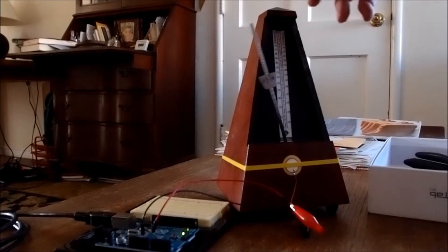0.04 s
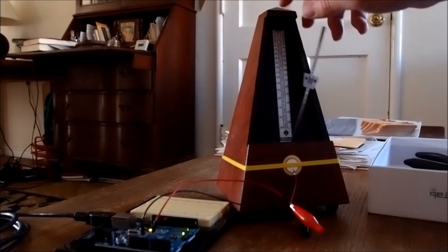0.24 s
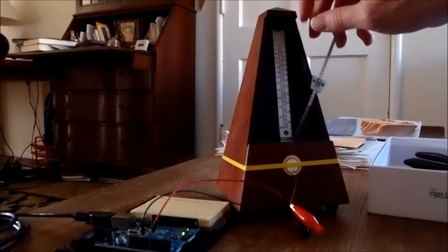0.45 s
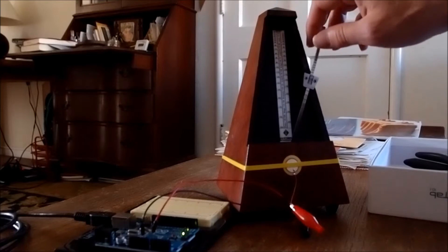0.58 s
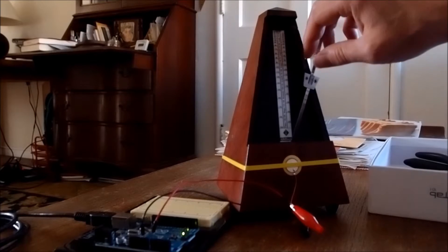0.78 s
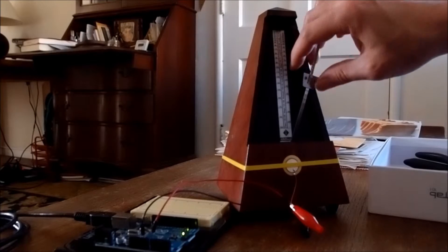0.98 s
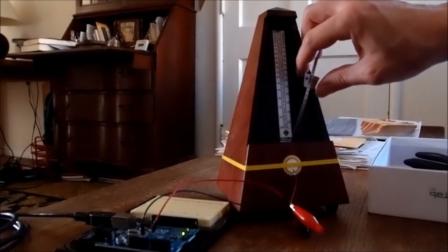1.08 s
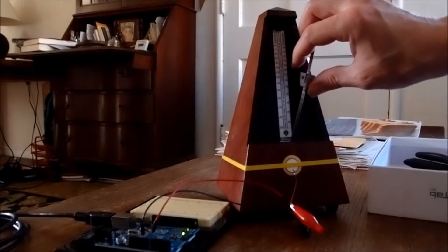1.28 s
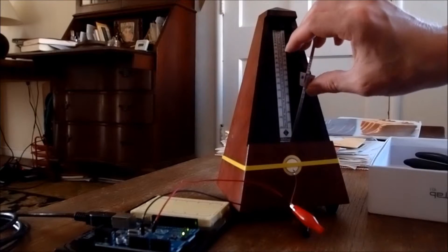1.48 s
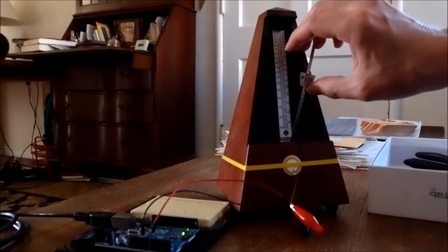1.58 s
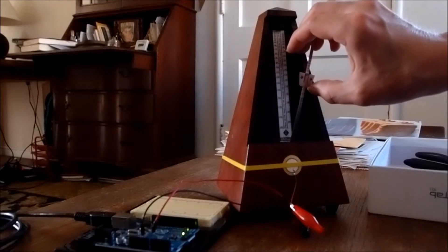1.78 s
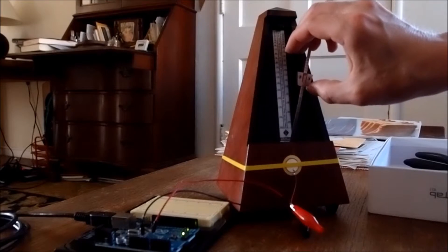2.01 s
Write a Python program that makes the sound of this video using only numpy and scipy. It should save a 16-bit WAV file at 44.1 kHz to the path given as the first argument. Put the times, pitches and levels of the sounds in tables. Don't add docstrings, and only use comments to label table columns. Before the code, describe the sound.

One loud, woody metronome tick in a quiet room, followed by soft metallic taps and light rubbing

```python
import sys
import numpy as np
from scipy import signal
from scipy.fft import rfft, irfft
from scipy.io import wavfile
from scipy.ndimage import uniform_filter1d

SR = 44100
rng = np.random.default_rng(int(sys.argv[2]) if len(sys.argv) > 2 else 0)


def to_wav(sig):
    pcm = np.clip(np.atleast_2d(sig), -1, 1) * 32767
    pcm = np.round(pcm).astype(np.int16)
    wavfile.write(sys.argv[1], SR, pcm.T)


def gain_from_decibels(decibels):
    exponent = np.asarray(decibels, float) / 20
    return 10 ** exponent


N = 90404

# frequency [Hz], density [dB per Hz].
FLOOR = [(30, -19), (100, -7), (300, 4.5), (700, -6.5), (2000, -14.5), (8000, -23), (11500, -30.5),
         (14500, -26)]
FLOOR_DB, FLICKER_DB = -52, -1.25
# frequency [Hz], width [Hz], level [dB].
FAN = [(81.4, 8, -69), (202.4, 15.3, -63.5), (287, 5.2, -72), (340, 6.1, -83), (1708, 13, -74.5)]
# frequency [Hz], level [dB], wobble [dB].
TONES = [
    (469, -53, 2),
    (15482, -70.5, 1.5),
]
MAINS_HZ, MAINS_DB = 120, -62
BEAT_HZ, BEAT_DB, BEAT_PEAK_S = 1.05, 6, 0.15

# delay [s], level [dB].
ECHOES = [(.0062, -17), (.0125, -20), (.0158, -13), (.027, -19), (.042, -20)]
# frequency [Hz], level [dB], decay time t60 [s].
ROOM = [(245, -28.5, 0.42), (487, -36.5, 0.49), (1080, -42.5, 0.54), (2000, -34, 0.47), (3700, -38.5, 0.51),
        (7000, -36.5, 0.51), (10200, -34, 0.35), (15400, -20, 0.12)]
ROOM_RISE_S = 0.0013

# start [s], level [dB], decay time t60 [s], lowest frequency [Hz].
SNAPS = [
    (.159, -52, .006, 8000),
    (0.597, -34.5, 0.0079, 1490),
    (.898, -52, 0.0095, 1490),
]
SNAP_TOP_HZ = 8900

# start [s], level [dB].
BLOWS = [
    (.24595, -2),
    (.2471, -12),
    (.2487, -12),
    (.2499, -17),
]
# frequency [Hz], level [dB], decay time t60 [s].
CASE = [(560, -22.5, 0.022), (737, -16.5, 0.054), (1084, -7, 0.0097), (1400, -36, 0.0044),
        (1770, -12.5, 0.013), (2380, -16, 0.0062), (2700, -6, 0.0087), (3290, -15.5, 0.009),
        (4200, -10, 0.023), (4730, -14, 0.0093), (5540, -12.5, 0.0079), (6510, -12, 0.0083),
        (8530, -17, 0.016), (10340, -18, 0.0043)]
# frequency [Hz], level [dB], decay time t60 [s].
STEEL_EDGE = (13700, -7, 0.0013)
# frequency [Hz], level [dB], decay time t60 [s].
DESK = [(209, -43.5, 0.17), (282.3, -32.5, 0.27), (478.5, -41, 0.34)]
# frequency [Hz], level [dB], t60 [s].
BACK = [(1100, -10, 0.023), (2104, -22, .03), (3566, -16, 0.034), (4697, -9, 0.025), (4860, -16, 0.032),
        (7030, -21.5, 0.014), (10800, -30, 0.0087)]
FRONT_HZ = 3000
FRONT_SPREAD_DB = -3
SPREAD_DB, SPREAD_S = 0.5, 0.003
BUILD_S, REBOUND_SCATTER_DB = 0.0002, 2
RATTLE_DB, RATTLE_T60_S = -16, 0.031
EARLIER_TICK_S, EARLIER_DB = 0.25, -1

# start [s], level [dB], rod pitch [Hz], decay time t60 [s], thud level [dB].
TOUCHES = [(0.608, -44, 7000, .008, -33.5), (0.62, -45, 2700, 0.011, -34), (.638, -57, 2000, 0.011, -49),
           (.598, -39, 3320, 0.012, -35), (.845, -46.5, 1830, .02, -68), (.898, -40, 3500, 0.0068, -60),
           (1.0934, -41, 2460, .012, -35), (1.1031, -39.5, 2660, 0.029, -48), (1.557, -42, 2580, .022, -63),
           (1.586, -58, 2500, 0.0099, -58)]
# pitch ratio, level [dB].
ROD = [(.75, -3), (1, 0), (1.24, -2)]
# start [s], level [dB], pitch [Hz], decay time t60 [s].
PINGS = [(1.092, -52, 10800, 0.0091), (1.0928, -43.5, 2680, 0.029), (1.109, -57, 3190, 0.017),
         (1.134, -51, 1890, 0.065), (1.558, -47.5, 6900, 0.017)]
CONTACT_S, TOUCH_NOISE_DB, TOUCH_WET_DB = 0.0012, -9, -2
THUD_HZ, THUD_T60_S = 272, 0.034
THUD_HIGH_HZ, THUD_HIGH_DB = 543, -5

# time [s], level [dB].
SLIDE = [(1.179, -80), (1.28, -64), (1.4, -65), (1.5, -66.5), (1.56, -89)]

# frequency [Hz], width [Hz], depth [dB].
GAPS = [(5260, 90, -18), (7730, 110, -16)]
# frequency [Hz], width [Hz], depth [dB].
DIPS = [(9500, 1070, -5.5), (12200, 440, -17)]
BASS_CUT_HZ, TOP_HZ = 180, 15790


def unit(x):
    return x / np.sqrt(np.mean(x ** 2))


def shaped(x, gain):
    return irfft(rfft(x) * gain(np.fft.rfftfreq(len(x), 1 / SR) + 1), len(x))


def band(hz, width_hz, size=N):
    noise = rng.standard_normal(size)
    return unit(shaped(noise, lambda f: 1 / (1 + (2 * (f - hz) / width_hz) ** 2)))


def fade(t, t60):
    return np.exp(-np.log(1000) * np.maximum(t, 0) / t60) * (t >= 0)


def ring(t, hz, t60):
    return fade(t, t60) * np.sin(2 * np.pi * min(hz, 0.45 * SR) * t)


def walk(rate):
    k = int(SR / rate)
    return unit(uniform_filter1d(uniform_filter1d(rng.standard_normal(N), k), k))


def background(t):
    floor_hz, floor_db = np.array(FLOOR).T
    floor = 0
    for centre in 30 * 2 ** np.arange(10):
        def gain(f):
            octave = np.cos(np.pi / 2 * np.clip(np.log2(f / centre), -1, 1))
            return gain_from_decibels(np.interp(np.log(f), np.log(floor_hz), floor_db)) * octave
        floor = floor + shaped(rng.standard_normal(N), gain) * gain_from_decibels(FLICKER_DB * walk(18))
    out = gain_from_decibels(FLOOR_DB) * unit(floor)
    out += sum(gain_from_decibels(db) * band(hz, width) for hz, width, db in FAN)
    for hz, db, wobble_db in TONES:
        level = gain_from_decibels(db + wobble_db * walk(13.3)) * np.sqrt(2)
        out += level * np.sin(2 * np.pi * hz * t + 0.5 * walk(5))
    beat_db = BEAT_DB * np.cos(2 * np.pi * BEAT_HZ * (t - BEAT_PEAK_S))
    return out + gain_from_decibels(MAINS_DB + beat_db) * np.sin(2 * np.pi * MAINS_HZ * t)


def room():
    t = np.arange(SR) / SR
    echoes = sum(gain_from_decibels(db) * np.maximum(1 - np.abs(t - s) * SR, 0) for s, db in ECHOES)
    tail = 0
    for hz, db, t60 in ROOM:
        tail = tail + gain_from_decibels(db) * np.sqrt(hz / SR) * band(hz, 0.51 * hz, size=SR) * fade(t, t60)
    return echoes, tail * (1 - np.exp(-(t / ROOM_RISE_S) ** 2))


def snaps(t):
    out = np.zeros(N)
    for s, db, t60, low_hz in SNAPS:
        def gain(f):
            return f ** 2 / (f ** 2 + low_hz ** 2) / np.hypot(1, f / SNAP_TOP_HZ)
        out += gain_from_decibels(db) * fade(t - s, t60) * shaped(rng.standard_normal(N), gain)
    return out


def tick(t):
    modes = [*CASE, STEEL_EDGE]
    scatter = rng.standard_normal((len(BLOWS), len(modes)))
    scatter[0] = 0
    start, start_db = BLOWS[0]
    out = sum(gain_from_decibels(db) * ring(t - start, hz, t60) for hz, db, t60 in DESK)
    for (s, blow_db), mix in zip(BLOWS, scatter):
        build = np.clip((t - s) / BUILD_S, 0, 1)
        for k, (hz, db, t60) in enumerate(modes):
            side = -1 if hz > FRONT_HZ else (-1) ** k
            if mix[k - 1] > 0:
                side = -side
            level = gain_from_decibels(blow_db + db + REBOUND_SCATTER_DB * mix[k])
            out = out + side * level * ring(t - s, hz, t60) * build
    out = out + gain_from_decibels(RATTLE_DB) * band(3100, 10500) * fade(t - start, RATTLE_T60_S)

    front = [(hz, db + FRONT_SPREAD_DB, t60) for hz, db, t60 in modes]
    power = sum(np.abs(rfft(gain_from_decibels(db) * ring(t, hz, t60))) ** 2 for hz, db, t60 in [*front, *DESK, *BACK])
    pulse = irfft(np.sqrt(power), N)
    spread = np.roll(pulse, int((start + SPREAD_S) * SR)) * gain_from_decibels(start_db + SPREAD_DB)
    return out, spread


def touches(t):
    out, noise = np.zeros(N), band(3000, 3000)
    for s, db, hz, t60, thud_db in TOUCHES:
        rod = sum(gain_from_decibels(part_db) * ring(t - s, hz * ratio, t60) for ratio, part_db in ROD)
        rod = rod + gain_from_decibels(TOUCH_NOISE_DB) * noise * fade(t - s, t60)
        thud = ring(t - s, THUD_HZ, THUD_T60_S)
        thud = thud + gain_from_decibels(THUD_HIGH_DB) * ring(t - s, THUD_HIGH_HZ, THUD_T60_S)
        out += (gain_from_decibels(db) * rod + gain_from_decibels(thud_db) * thud) * np.clip((t - s) / CONTACT_S, 0, 1)
    return out + sum(gain_from_decibels(db) * ring(t - s, hz, t60) for s, db, hz, t60 in PINGS)


def slide(t):
    s, db = np.array(SLIDE).T
    return gain_from_decibels(np.interp(t, s, db) + 1.1 * walk(72)) * band(5200, 5300)


def scene():
    t = np.arange(N) / SR
    bass_cut = signal.butter(3, BASS_CUT_HZ, "high", fs=SR, output="sos")
    beat, spread = signal.sosfilt(bass_cut, tick(t))
    hand = signal.sosfilt(bass_cut, touches(t) + snaps(t) + slide(t))
    echoes, tail = room()
    wet = signal.fftconvolve(beat, echoes) + signal.fftconvolve(spread, tail)
    skip = int((BLOWS[0][0] + EARLIER_TICK_S) * SR)
    earlier = gain_from_decibels(EARLIER_DB) * wet[skip:skip + N]
    hand_wet = gain_from_decibels(TOUCH_WET_DB) * signal.fftconvolve(hand, echoes + tail)[:N]
    return (beat + wet[:N] + earlier + hand + hand_wet + background(t))[None]


def low_pass(x):
    return signal.sosfilt(signal.butter(12, 16850, fs=SR, output="sos"), x)


def record(dry):
    x = dry[0]
    for hz, width, db in GAPS:
        x = x - (1 - gain_from_decibels(db)) * signal.lfilter(*signal.iirpeak(hz, hz / width, fs=SR), x)

    def gain(f):
        dips_db = sum(db * np.exp(-((f - hz) / width) ** 2) for hz, width, db in DIPS)
        top_cut_db = -70 / (1 + np.exp(np.clip((TOP_HZ - f) / 12, -50, 50)))
        return gain_from_decibels(dips_db + top_cut_db)

    return low_pass(shaped(x, gain)[None])


dry = scene()
out = record(dry)
to_wav(out)
```